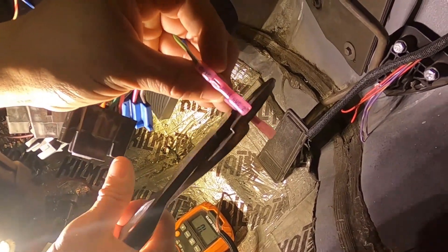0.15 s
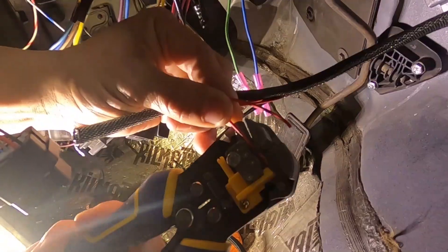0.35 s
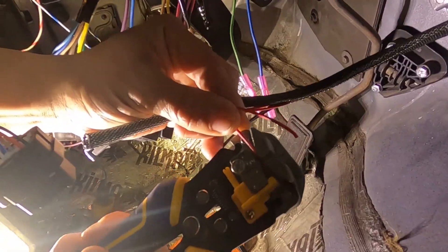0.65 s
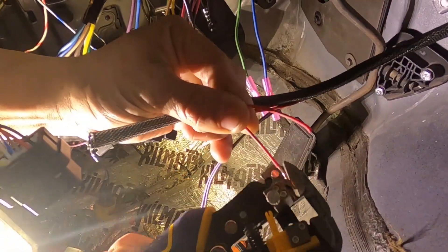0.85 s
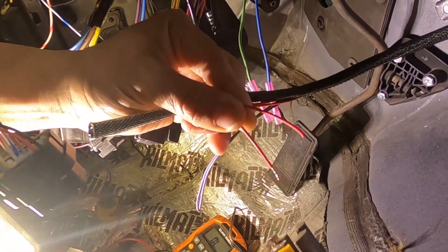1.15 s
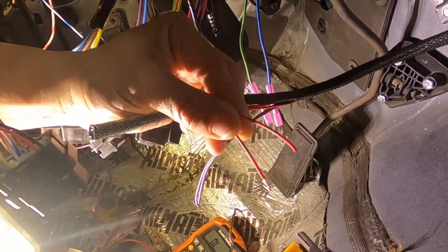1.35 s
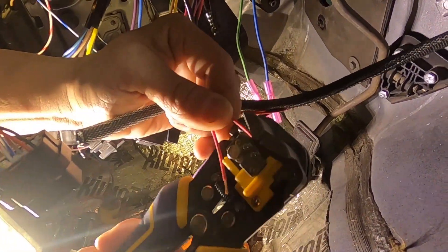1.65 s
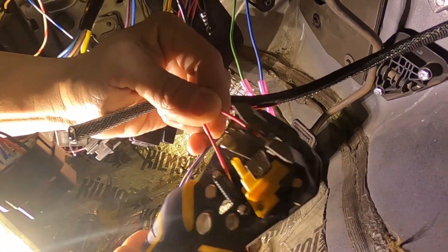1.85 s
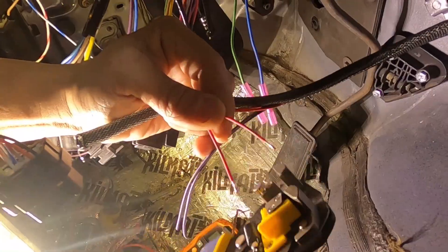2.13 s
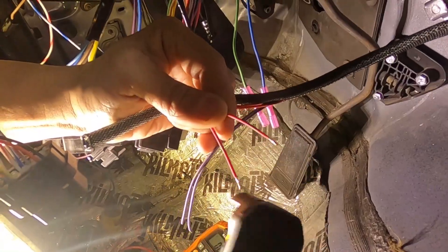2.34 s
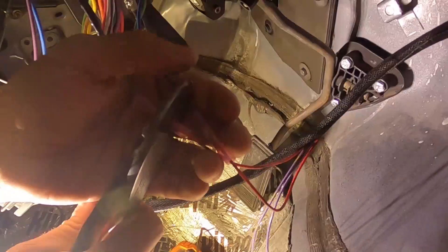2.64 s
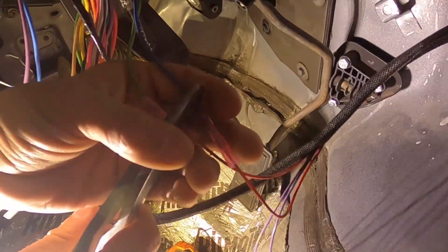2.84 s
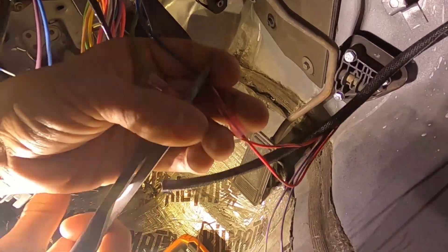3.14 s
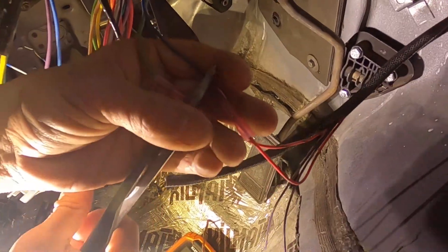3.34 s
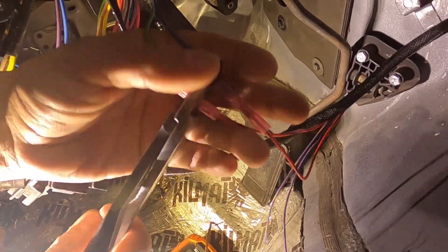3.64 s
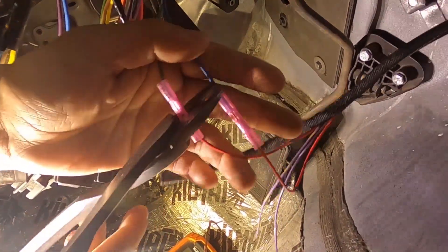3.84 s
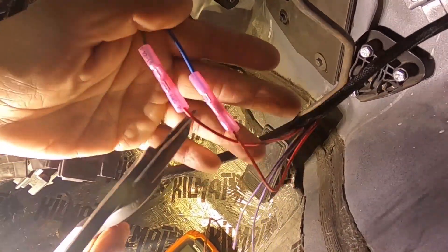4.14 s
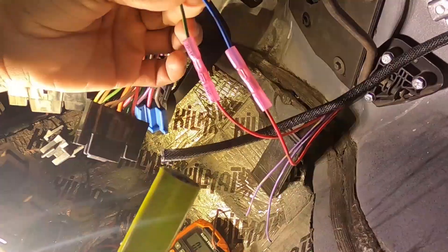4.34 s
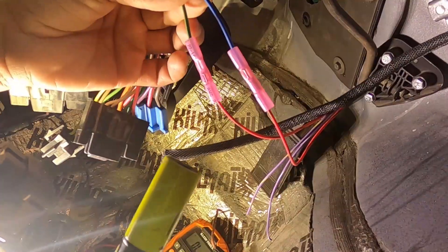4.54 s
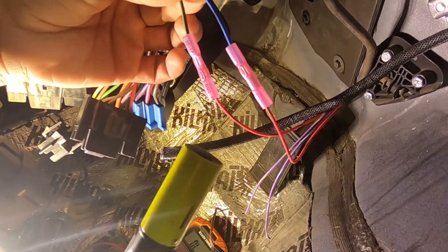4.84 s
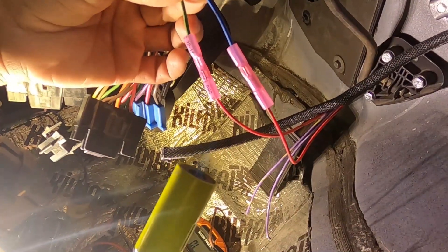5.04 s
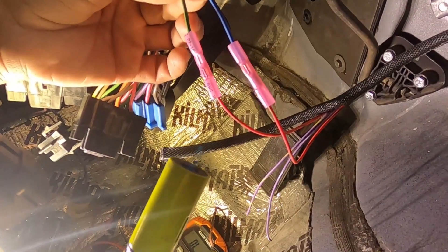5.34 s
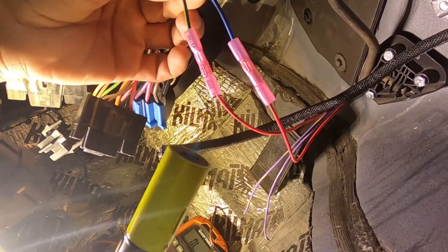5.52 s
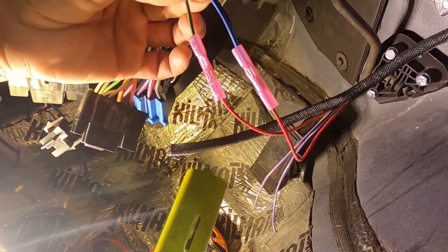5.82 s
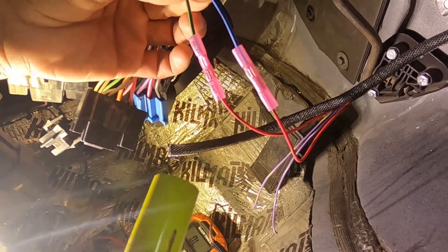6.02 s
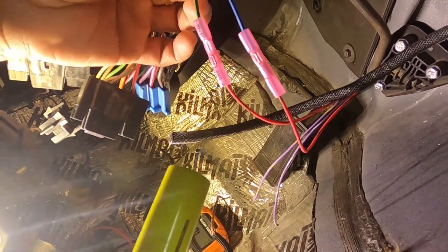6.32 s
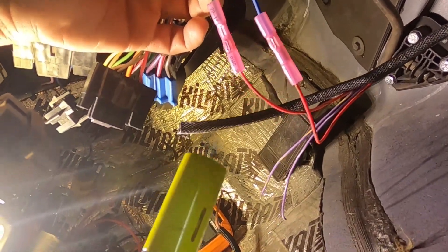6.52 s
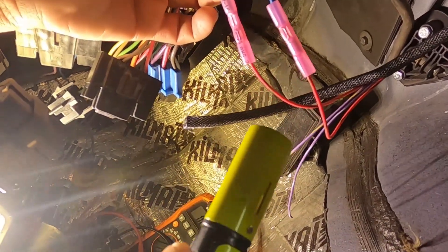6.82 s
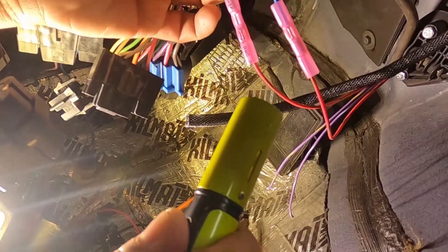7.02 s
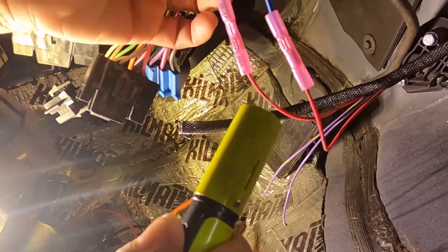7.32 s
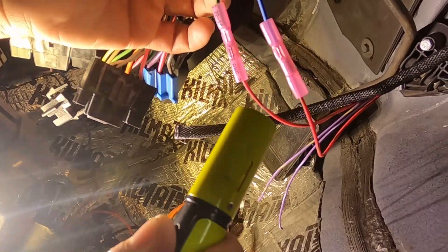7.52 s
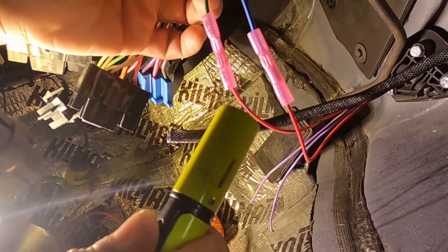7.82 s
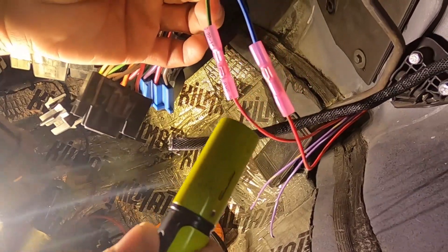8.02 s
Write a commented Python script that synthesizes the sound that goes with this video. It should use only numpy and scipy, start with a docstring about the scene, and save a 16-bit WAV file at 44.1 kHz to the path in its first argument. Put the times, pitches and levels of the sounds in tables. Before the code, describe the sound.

A low, uneven rumble fills a car interior. Near the microphone, spring-loaded steel jaws clack hard and rattle, one snap leaving a faint high ring. Fingers softly rub thin wires, with small ticks. Then sharp lighter clicks follow, some giving only weak gas hiss, the third a brief blowing flame, and the last a longer jet burning to the end. Dry, close, nearly mono.

```python
"""Wiring work in a car's footwell, over a low rumble that wanders throughout and booms once early on.
Wires tick and rub under the fingers while a spring-loaded wire stripper clacks, rattles and clinks;
one hard snap leaves its spring singing. After more rustling a piezo jet lighter is snapped five times:
two tries only hiss, the third thumps and burns, the fourth hisses, the fifth burns on and flutters.
Contacts are filtered noise bursts with steel modes; gas, flame and rumble are shaped noise."""
import sys
import numpy as np
from scipy import signal
from scipy.fft import rfft, irfft, next_fast_len
from scipy.io import wavfile
from scipy.ndimage import map_coordinates

SR = 44100
rng = np.random.default_rng(int(sys.argv[2]) if len(sys.argv) > 2 else 0)


def generate_wav(sig):
    """Save sig (samples, or channels by samples) to the path in sys.argv[1] as 16-bit PCM at SR."""
    pcm = np.round(np.clip(np.atleast_2d(sig).T, -1, 1) * 32767).astype(np.int16)
    wavfile.write(sys.argv[1], SR, pcm)


N = 360297
TIME = np.arange(N) / SR
AGE = np.arange(SR // 3) / SR  # seconds since a contact
TOP_HZ = 15850

# Stripper snaps. Each row: cam trip in seconds, trip level in dB, jaw slam in seconds, slam level in dB,
# slam ring centre in Hz, slam low knock in dB, rebound level in dB, settling level in dB (levels relative).
STRIPPER_SNAPS = [(0.8422, -17.5, 0.8722, -6, 6210, -4.5, -10.5, -23),
                  (1.1378, -10.5, 1.1638, -6.5, 6370, 0.5, -29, -35.5),
                  (1.3887, -20, 1.4253, -6.5, 5750, -0.5, -26.5, -17.5),
                  (1.9899, -18, 2.0117, -8, 6380, 11.5, -12, -22.5),
                  (2.378, -28, 2.3985, -9.5, 5420, 0.5, -18.5, -22),
                  (2.4273, -7.5, 2.4572, -3.5, 3677, 7.5, -18.5, -32.5),
                  (2.648, -15, 2.6665, -4.5, 4190, -5, -11.5, -37)]
# Loose jaws clink as the tool is moved. Each row: start in seconds, relative level in dB, ring centre in Hz.
JAW_CLINKS = [(1.01, -24, 5500), (1.037, -24, 4400), (1.2553, -26.5, 4850), (1.3067, -19.5, 3940),
              (2.1545, -30.5, 4800), (2.2933, -31, 3700), (2.546, -28.5, 3200)]
# Cuts where the ringing of the snaps breaks off abruptly. Each entry: time in seconds.
CUTS_S = [1.471, 2.689]
# The return spring sings after the hardest snap. One row: start in seconds, pitch in Hz, level in dB,
# 60 dB decay time in seconds.
SINGING_SPRING = (2.457, 4409, -58, .9)
REBOUND_DELAY_S, SETTLE_DELAY_S = 0.0083, 0.028  # after the slam
SLIDE_DB = -25  # relative level
# ring of each stage: centre in Hz, low knock in dB, rattle 60 dB decay time in seconds
TRIP_RING, SLIDE_RING = (4700, -1.8, 0.033), (5100, 3, 0.028)
REBOUND_RING, SETTLE_RING = (4200, 2.3, 0.032), (3900, 7.1, 0.028)


def stripper():
    """Each snap is one chain: the cam trips and drags, the jaws slam home, rebound and settle."""
    out = np.zeros(N)
    for start_s, db, centre_hz in JAW_CLINKS:
        out += jaw_contact(start_s, db, centre_hz, knock_db=0, t60_s=0.03)
    for trip_s, trip_db, slam_s, slam_db, centre_hz, knock_db, rebound_db, settle_db in STRIPPER_SNAPS:
        chain = jaw_contact(trip_s, trip_db, *TRIP_RING)
        chain += jaw_contact((trip_s + slam_s) / 2, SLIDE_DB, *SLIDE_RING)
        chain += jaw_contact(slam_s, slam_db, centre_hz, knock_db, t60_s=0.025)
        chain += jaw_contact(slam_s + REBOUND_DELAY_S, rebound_db, *REBOUND_RING)
        chain += jaw_contact(slam_s + SETTLE_DELAY_S, settle_db, *SETTLE_RING)
        cut_s = min(cut for cut in CUTS_S if cut > slam_s)
        out += chain * (TIME < cut_s)
    start_s, hz, db, t60_s = SINGING_SPRING
    tone = np.sin(2 * np.pi * hz * AGE) * amp(db - 60 * AGE / t60_s)
    add(out, start_s, tone * (start_s + AGE < CUTS_S[-1]))
    return out


def jaw_contact(start_s, db, centre_hz, knock_db, t60_s):
    """One contact of the stripper's steel parts, ringing in the footwell."""
    out = np.zeros(N)
    hit = clack(centre_hz, knock_db, t60_s, focus_db=5.5, crack_db=-19.0, top_loss_db=3.5)
    room = footwell(hit, near_db=-6.5, near_t60_s=0.071, far_db=-27.5, far_t60_s=0.35)
    add(out, start_s, amp(db + 10.5) * room)
    add(out, *lead_in(start_s, db - 3.5, t60_s=0.042))
    return out


# Spectrum of a contact. Each row: frequency in Hz, relative level in dB.
CONTACT_SPECTRUM = [(120, -24.5), (280, -13), (550, -21.5), (950, -11.5), (1500, -7), (3000, -2),
                    (6500, -1.5), (7300, -5.5), (8000, -12.5), (10500, -16.5), (12500, -21), (15500, -39)]
# Modes of the steel. Each row: frequency in Hz, width in Hz, mean height in dB.
STEEL_MODES = [(1320, 44, 6.5), (2360, 140, 0.59), (3350, 250, 1.7), (4393, 63, 2.7), (5800, 180, 2.9),
               (7000, 79, 1.4), (8340, 260, 5)]


def clack(centre_hz, knock_db, t60_s, focus_db, crack_db, top_loss_db):
    """One contact of energy 1: a sharp crack and a dense rattle, strongest near its own centre."""
    push = burst(t60_s) + amp(crack_db) * (AGE == 0)
    # every contact wakes the modes at new strengths, and adds one of its own
    modes = [(hz, width, db + 3 * rng.normal()) for hz, width, db in STEEL_MODES]
    steel = shape(CONTACT_SPECTRUM, modes + [(centre_hz, 220, 6)])

    def db_of(hz):
        knock = knock_db / (1 + (hz / 2200) ** 2)
        top_loss = top_loss_db * (hz / TOP_HZ) ** 2  # negative brightens
        return steel(hz) + focus_db * focus(hz, centre_hz) + knock - top_loss

    return energy_one(colour(push, db_of))


# Spectrum of the lead-in. Each row: frequency in Hz, relative level in dB.
LEAD_IN_SPECTRUM = [(1000, -30.5), (2000, -16.5), (2700, -5.5), (3500, -9), (4900, -6.5), (5600, -3.5),
                    (7200, -6), (8100, -22), (9800, -27.5), (12500, -26), (15000, -47.5)]
# Resonances of the lead-in. Each row: frequency in Hz, width in Hz, height in dB.
LEAD_IN_MODES = [(2680, 50, 6), (4080, 190, 5), (5400, 240, 5), (6190, 200, 12), (7250, 53, 2.4),
                 (6700, 390, 6), (9750, 540, 19)]


def lead_in(contact_s, db, t60_s):
    """A faint reversed ringing that leads into each contact: (start in seconds, sound)."""
    ringing = colour(burst(t60_s), shape(LEAD_IN_SPECTRUM, LEAD_IN_MODES))[:SR // 10]
    return contact_s - len(ringing) / SR, amp(db) * energy_one(ringing[::-1])


# Tries of the lighter. Each row: press in seconds, release in seconds, gas thump in dB, gas flow in dB,
# trigger click in relative dB, lit (0 or 1).
LIGHTER_TRIES = [(4.47, 4.679, -21, -74, -20, 0), (4.804, 4.967, -17.5, -68.5, -18, 0),
                 (5.0965, 5.709, -10, -50, -12, 1), (6.1214, 6.345, -36, -59.5, -18.5, 0),
                 (6.4645, 8.3, -9.5, -48.5, -18, 1)]
# Spectrum of the hammer snap. Each row: frequency in Hz, relative level in dB.
HAMMER_SPECTRUM = [(300, -19), (800, -43), (1120, -41.5), (1330, -2), (1600, -8.5), (2400, 0), (2700, 5),
                   (3100, -7.5), (6300, -5.5), (7300, -8), (8200, -21.5), (10800, -36), (12300, -24.5),
                   (15000, -43.5)]
HAMMER_DB = -3.5  # relative level, the same for every try


def lighter():
    """The piezo hammer snaps and rattles the case, the puff of gas thumps, the trigger clicks back."""
    out = np.zeros(N)
    for press_s, release_s, thump_db, _, click_db, _ in LIGHTER_TRIES:
        snap = energy_one(colour((AGE == 0) + amp(-6) * burst(0.013), shape(HAMMER_SPECTRUM)))
        snap = footwell(snap, near_db=-10, near_t60_s=0.074, far_db=-27, far_t60_s=0.47)
        add(out, press_s, amp(HAMMER_DB + 10.5) * snap)

        case = clack(5500, knock_db=-2, t60_s=0.041, focus_db=0.0, crack_db=-23, top_loss_db=-3.0)
        case = footwell(case, near_db=-6, near_t60_s=0.063, far_db=-25.5, far_t60_s=0.21)
        add(out, press_s + 0.0016, amp(HAMMER_DB - 4.0) * case)
        add(out, *lead_in(press_s, HAMMER_DB + 3.5, t60_s=0.048))

        thump = np.sin(2 * np.pi * 94 * AGE) * amp(-60 * AGE / 0.12) * (1 - np.exp(-AGE / 0.0013))
        add(out, press_s + 0.0018, amp(thump_db) * thump)

        click = clack(3200, knock_db=10.5, t60_s=0.028, focus_db=-1.0, crack_db=-5.5, top_loss_db=-10.5)
        click = footwell(click, near_db=-11.5, near_t60_s=0.089, far_db=-29.5, far_t60_s=0.21)
        add(out, release_s, amp(click_db + 12.0) * click)
        add(out, *lead_in(release_s, click_db - 5, t60_s=0.041))
    return out


# Spectra of unlit gas and of the flame. Each row: frequency in Hz, relative level in dB.
HISS_SPECTRUM = [(710, -47.5), (1200, 2), (1380, 3), (2260, -14), (2650, -11), (5550, -5), (7170, 2),
                 (8880, -23), (12400, -6.5), (15500, -35)]
FLAME_SPECTRUM = [(250, -41), (420, -12), (535, -9), (723, 3.5), (921, -2.5), (1040, 2.5), (1170, -5),
                  (1410, 0.5), (1820, -8.5), (2080, -9), (3270, -20), (6270, -26), (7740, -30),
                  (12200, -29), (15500, -47)]
# Resonances of the cold and the burning nozzle. Each row: frequency in Hz, width in Hz, height in dB.
COLD_NOZZLE_MODES = [(2680, 90, 3), (6260, 250, 8.5), (6900, 500, 5), (12400, 700, 3)]
LIT_NOZZLE_MODES = [(748, 99, 0.5), (1056, 58, 3.5), (1168, 20, -20), (1322, 42, -4), (1550, 100, -12.5),
                    (1797, 19, -14), (1990, 270, 5), (2370, 78, -5.5), (2560, 180, 5), (7840, 720, -9)]
# The flame's low flutter. Each row: time in seconds, level in dB.
FLUTTER_LEVEL = [(6.45, -88.5), (6.6, -61.5), (7.65, -59), (7.85, -49.5), (8.17, -61)]
OPEN_LAG_S, SHUT_LAG_S = 0.007, 0.012  # the valve lags the trigger


def jet():
    """Gas flows while the trigger is held: unlit it hisses; lit it roars, flickers and brightens."""
    hiss = noise(shape(HISS_SPECTRUM, COLD_NOZZLE_MODES))
    roar = noise(shape(FLAME_SPECTRUM, LIT_NOZZLE_MODES))
    roar = panels(roar, strength=0.085, drift_s=0.00007, count=12)
    bright = unit(colour(roar, lambda hz: 5 * focus(hz, 3400)))
    flicker = amp(0.61 * wobble(9))
    out = np.zeros(N)
    for press_s, release_s, _, flow_db, _, lit in LIGHTER_TRIES:
        heat = np.clip((TIME - press_s) / 1.9, 0, 1)
        flame = flicker * ((1 - heat) * roar + heat * bright)
        gate = valve(press_s + OPEN_LAG_S, release_s + SHUT_LAG_S)
        out += amp(flow_db) * gate * (flame if lit > 0.5 else hiss)
    flutter = noise(shape([(150, -25), (250, -0.5), (300, 1.0), (420, -16.5), (900, -67.0)]))
    return out + amp(curve(FLUTTER_LEVEL)) * flutter


def panels(x, strength, drift_s, count):
    """Nearby panels reflect the upper part of the jet; each path drifts as the hand moves."""
    upper = colour(x, shape([(1500, -20), (3000, 0)]))
    reflections = np.zeros(N)
    for _ in range(count):
        sign = np.sign(rng.normal())
        delay_s = rng.uniform(0.0006, 0.005) + drift_s * wobble(1.5)
        reflections += sign * np.interp(TIME - delay_s, TIME, upper)
    return unit(x + strength * reflections)


def valve(start_s, stop_s):
    """Gas flow ramps up over 8.4 ms and down over 4 ms."""
    return np.clip((TIME - start_s) / 0.0084, 0, 1) * np.clip((stop_s - TIME) / 0.004, 0, 1)


# Rubbing strokes. Each row: start in seconds, end in seconds, level before fading in dB, centre in Hz.
RUB_STROKES = [(0.482, 0.726, -68, 3330), (1.207, 1.371, -58.5, 4600), (1.62, 1.878, -75.5, 4720),
               (2.037, 2.214, -59, 5320), (2.775, 3.098, -66.5, 4900), (3.082, 3.193, -66, 9870),
               (3.722, 3.895, -65.5, 7340), (3.856, 4.067, -70, 6130), (4.215, 4.31, -65, 4140)]
# Spectrum of rubbing. Each row: frequency in Hz, relative level in dB.
RUSTLE_SPECTRUM = [(1060, -49), (1800, -4.5), (1980, -7.5), (2290, -5), (2880, -8), (5410, -8),
                   (12600, -29.5), (15000, -35.5)]
THUMB_S, THUMB_DB = 0.052, -55  # slide length, level before fading


def rustle():
    """Skin and insulation rub, the thumb slides off the trigger: strokes of uneven grains swell and fade."""
    out = np.zeros(N)
    grains = rng.standard_normal(N) * amp(2.7 * wobble(760) + 2.8 * wobble(45))
    thumb = [(release_s - THUMB_S, release_s, THUMB_DB, 4700)
             for _, release_s, *_ in LIGHTER_TRIES if release_s < TIME[-1]]
    rub_db = shape(RUSTLE_SPECTRUM)
    for start_s, stop_s, db, centre_hz in RUB_STROKES + thumb:
        length = max(round((stop_s - start_s) * SR), 256)
        rub = grains[round(start_s * SR):][:length]
        rub = unit(colour(rub, lambda hz: rub_db(hz) + 8 * focus(hz, centre_hz)))
        add(out, start_s, amp(db) * rub * np.sin(np.linspace(0, np.pi, len(rub))))
    return out


# Light ticks of wires, sleeves and fingers. Each row: start in seconds, relative level in dB, ring centre in Hz.
WIRE_TICKS = [(0.3644, -47.5, 4620), (0.6128, -40.5, 3350), (0.6457, -40, 3500), (1.2374, -39, 4600),
              (1.3481, -40, 4500), (1.717, -43.5, 5830), (2.0773, -36.5, 2540), (2.1927, -35, 5400),
              (3.056, -41, 4870), (3.364, -34.5, 5670), (3.7998, -41.5, 5230), (4.132, -22, 3700),
              (4.159, -37, 2710), (4.28, -43, 4030), (4.4047, -43.5, 2460), (6.3132, -32.5, 3100),
              (6.395, -40, 2070)]
# Dull pops. Each row: start in seconds, peak in dB.
DULL_POPS = [(.302, -32), (4.341, -28)]


def ticks():
    """Wires and sleeves flick against fingers and tools; two decaying pulses make dull pops."""
    out = np.zeros(N)
    for start_s, db, centre_hz in WIRE_TICKS + snags():
        hit = clack(centre_hz, knock_db=15, t60_s=0.021, focus_db=9.5, crack_db=-2.0, top_loss_db=5.0)
        hit = footwell(hit, near_db=-10.0, near_t60_s=0.22, far_db=-20.5, far_t60_s=0.3)
        add(out, start_s, amp(db + 11.5) * hit)
        add(out, *lead_in(start_s, db - 4.0, t60_s=0.06))
    for start_s, db in DULL_POPS:
        add(out, start_s, amp(db - 60 * AGE / 0.023))
    return out


SNAGS_PER_S, SNAG_DB, SNAG_SPREAD_DB = 10, 16.5, 8  # rate, level over the stroke's, scatter either way


def snags():
    """A rubbed wire catches at chance moments: rows like WIRE_TICKS, louder in firmer strokes."""
    rows = []
    for start_s, stop_s, db, centre_hz in RUB_STROKES:
        length_s = stop_s - start_s
        for place, strength, pitch in rng.uniform(-1, 1, (round(SNAGS_PER_S * length_s), 3)):
            snag_s = start_s + length_s * (1 + place) / 2
            snag_db = db + SNAG_DB + SNAG_SPREAD_DB * strength
            rows.append((snag_s, snag_db, centre_hz * 2 ** (pitch / 2)))
    return rows


# Rumble level. Each row: time in seconds, level in dB.
RUMBLE_LEVEL = [(0, -31.5), (0.8, -34), (1.3, -33.5), (2.0, -33), (2.6, -32), (3.3, -31), (3.8, -32),
                (4.8, -33), (5.7, -33.5), (6.2, -32.5), (7.0, -35), (8.17, -32.5)]
# Spectra of the rumble and of the air noise. Each row: frequency in Hz, relative level in dB.
RUMBLE_SPECTRUM = [(12, -51.5), (20, -28), (29, -14), (38, -13.5), (54, 3.5), (70, -5.5), (97, 2.5),
                   (155, -9.5), (179, -24), (203, -19.5), (219, -14.5), (249, -28.5), (283, -24.5),
                   (321, -36.5), (420, -43), (550, -63.5), (920, -120)]
AIR_SPECTRUM = [(220, -21), (380, -4), (423, -4), (603, -13), (682, -4.5), (942, -15.5), (1060, -7),
                (1400, -6), (1800, -18), (2130, -15), (2720, -39.5), (9310, -46), (10400, -51),
                (15000, -59)]
# Cabin resonances. Each row: frequency in Hz, width in Hz, height in dB.
CABIN_MODES = [(21.8, 6.7, -9), (52, 9, 0.5), (65.4, 22, 1), (95.5, 4.2, 4), (152, 10, 3.5), (195, 24, -1),
               (227.1, 12, 4.5)]


def background():
    """A low rumble resonates and wanders in the car body under faint air noise."""
    level_db = curve(RUMBLE_LEVEL) + 1 * wobble(6.3)  # 1 dB chance swells
    rumble = amp(level_db) * noise(shape(RUMBLE_SPECTRUM, CABIN_MODES))
    air = amp(-65.5) * noise(shape(AIR_SPECTRUM))
    hiss = noise(shape([(1500, -14.0), (2500, 2.0), (6500, 0), (8200, -16.0), (14000, -31.5)]))
    return rumble + air + amp(-76.5) * hiss


# The deep note. One row: centre in seconds, time from centre to 1/e in seconds, pitch in Hz, peak in dB.
DEEP_BOOM = (1.65, .1, 51, -29)


def boom():
    """One deep resonance of the car body rises out of the rumble and sinks back."""
    centre_s, half_s, hz, db = DEEP_BOOM
    return amp(db) * np.sin(2 * np.pi * hz * TIME) * np.exp(-((TIME - centre_s) / half_s) ** 2)


def footwell(x, near_db, near_t60_s, far_db, far_t60_s):
    """Close panels scatter a sound at once; the cabin adds a faint longer tail."""
    tail = amp(near_db) * burst(near_t60_s) + amp(far_db) * burst(far_t60_s)
    return x + signal.fftconvolve(x, tail)[:len(x)]


def burst(t60_s):
    """Exponentially dying noise of energy 1."""
    return energy_one(rng.standard_normal(len(AGE)) * np.exp(-np.log(1000) * AGE / max(t60_s, 1e-3)))


def noise(db_of):
    """Steady coloured noise of rms 1."""
    length = 10 * SR
    spectrum = rfft(rng.standard_normal(length)) * amp(db_of(np.fft.rfftfreq(length, 1 / SR)))
    return unit(irfft(spectrum)[:N])


def colour(x, db_of):
    """Causal (minimum-phase) filter with the given dB by frequency, via the folded cepstrum."""
    m = 2 * next_fast_len(len(x) // 2 + 2048)
    cepstrum = irfft(np.log(amp(db_of(np.fft.rfftfreq(m, 1 / SR))) + 1e-6))
    cepstrum[1:m // 2] *= 2
    cepstrum[m // 2 + 1:] = 0
    return irfft(rfft(x, m) * np.exp(rfft(cepstrum)))[:len(x)]


def shape(points, resonances=()):
    """A spectrum with resonant bumps, as a function giving dB by frequency."""
    f, db = np.transpose(points)

    def db_of(hz):
        bumps = sum(g / (1 + (2 * (hz - c) / w) ** 2) for c, w, g in resonances)
        return np.interp(np.log(hz + 1), np.log(f), db) + bumps

    return db_of


def focus(hz, centre_hz):
    """A broad bump of height 1 around a centre frequency."""
    return np.exp(-(np.log2((hz + 1) / centre_hz) / 0.63) ** 2)


def wobble(knots_per_s):
    """A smooth random curve through normally distributed knots."""
    knots = rng.standard_normal(int(N * knots_per_s / SR) + 4)
    return map_coordinates(knots, [TIME * knots_per_s])


def curve(rows):
    """(seconds, value) rows as one value per sample."""
    return np.interp(TIME, *np.transpose(rows))


def amp(db):
    """Decibels to gain."""
    return 10 ** (np.asarray(db) / 20)


def unit(x):
    """Scale to rms 1."""
    return x / np.sqrt(np.mean(x ** 2) + 1e-20)


def energy_one(x):
    """Scale to energy 1."""
    return x / np.linalg.norm(x)


def add(track, start_s, x):
    """Mix x into the track from start_s on."""
    start = max(round(start_s * SR), 0)
    part = track[start:start + len(x)]
    part += x[:len(part)]


# Stereo spread. Each row: frequency in Hz, side over mid in dB.
SIDE_OVER_MID = [(60, -82), (110, -78), (200, -49.5), (380, -37), (700, -37), (1290, -46), (2380, -42.5),
                 (4400, -33.5), (8120, -25.5), (15000, 1.5)]


def scene():
    """All sources are central; a quarter-cycle-shifted side signal spreads mainly the top treble."""
    mix = stripper() + lighter() + jet() + rustle() + ticks() + background() + boom()
    m = next_fast_len(N + SR // 2)
    side_gain = amp(shape(SIDE_OVER_MID)(np.fft.rfftfreq(m, 1 / SR)))
    side = irfft(rfft(mix, m) * 1j * side_gain, m)[:N]
    return np.array([mix + side, mix - side])


def record(dry):
    """The recorder rounds off the tallest peaks and keeps nothing above its band limit."""
    rounded = dry / (1 + (dry / 0.85) ** 6) ** (1 / 6)
    m = next_fast_len(N + SR // 2)
    in_band = np.fft.rfftfreq(m, 1 / SR) < TOP_HZ
    return irfft(rfft(rounded, m) * in_band, m)[:, :N]


dry = scene()
out = record(dry)
generate_wav(out)
```